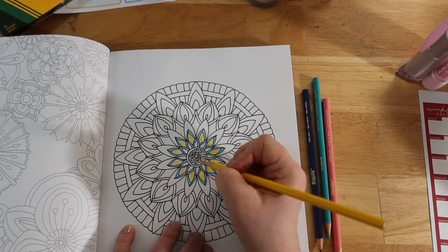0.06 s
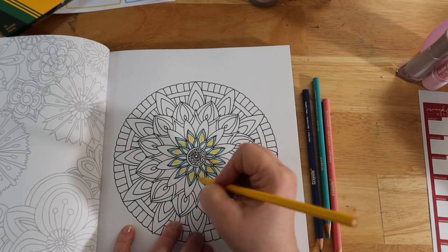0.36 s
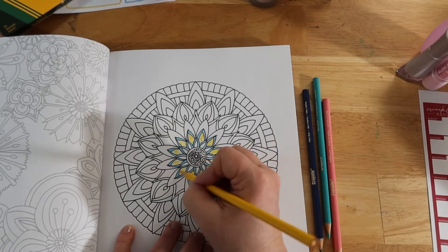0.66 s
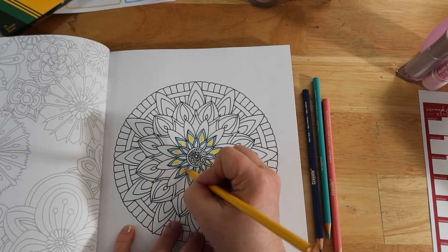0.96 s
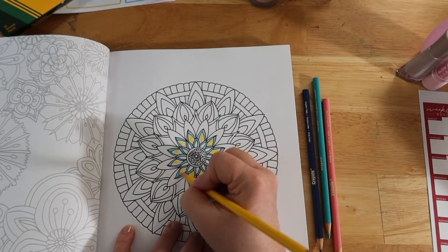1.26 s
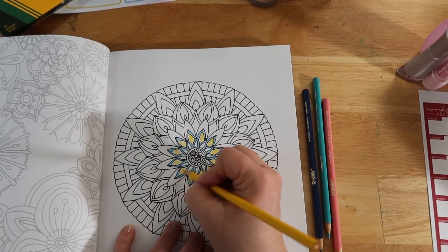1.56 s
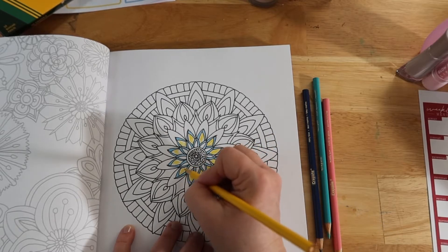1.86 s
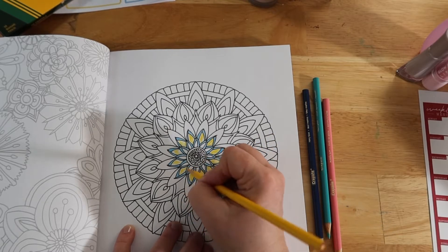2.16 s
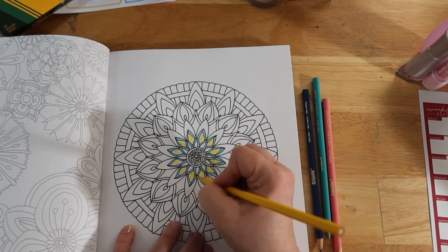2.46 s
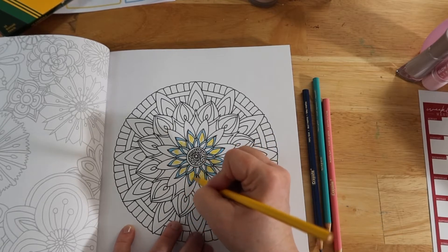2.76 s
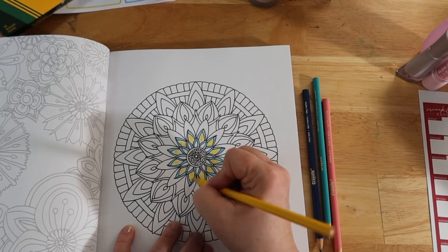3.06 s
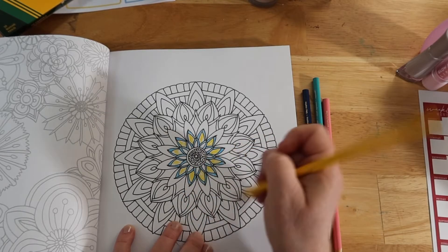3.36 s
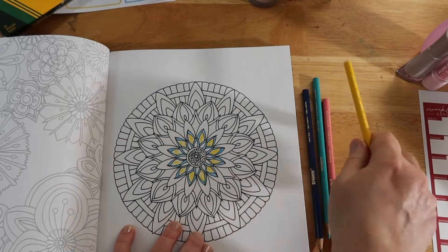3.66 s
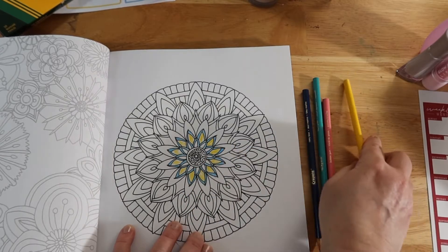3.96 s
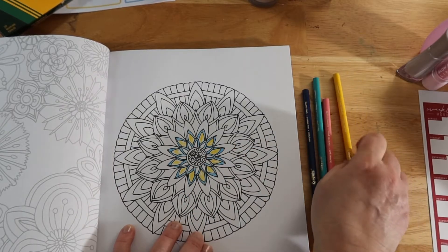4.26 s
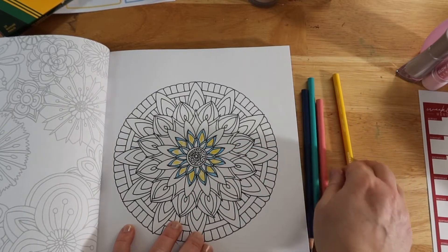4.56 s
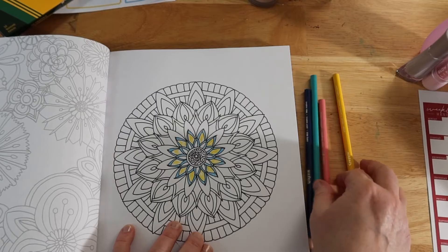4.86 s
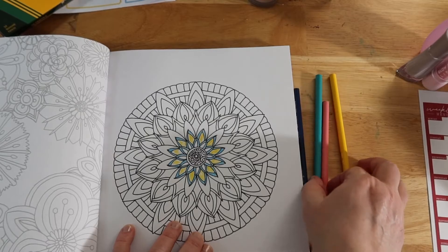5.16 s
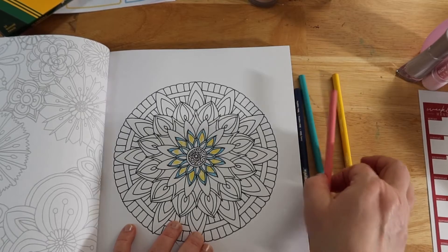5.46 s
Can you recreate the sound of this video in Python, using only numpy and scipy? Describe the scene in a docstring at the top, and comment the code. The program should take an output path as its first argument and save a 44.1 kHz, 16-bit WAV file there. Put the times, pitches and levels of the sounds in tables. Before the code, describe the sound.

A colored pencil rubs faintly on paper, then drops and bounces on a wooden table, where pencils clack and scrape together.

```python
"""Coloured pencils on a wooden table

In a quiet room a pencil rubs faintly on a colouring book, taps the table and is let go.
It bounces and rolls to rest; then a hand pushes the pencils beside it, which clack, scrape and knock.
Each hit makes pencil and table ring with a few fading tones; rubbing is noise that swells and fades."""
import sys
import numpy as np
from scipy import signal
from scipy.fft import rfft, irfft
from scipy.io import wavfile
from scipy.ndimage import uniform_filter1d

SR = 44100
rng = np.random.default_rng(int(sys.argv[2]) if len(sys.argv) > 2 else 0)


def to_wav(sig):
    """Store sig (one row per channel, or 1-D mono) as 16-bit WAV at the path in sys.argv[1].

    Samples outside -1..1 are clipped; the rate is SR.
    """
    pcm = np.clip(np.atleast_2d(sig), -1, 1) * 32767
    pcm = np.round(pcm).astype(np.int16)
    wavfile.write(sys.argv[1], SR, pcm.T)  # frames by channels


N = 247842
TIME, RING_TIME = np.arange(N) / SR, np.arange(SR // 3) / SR

# The held pencil taps the table: start_s, pencil_db, table_db, cutoff_hz
TAPS = [(3.888, -17.5, -29.5, 9900), (3.9372, -22, -32, 8500), (3.964, -29, -34.5, 4160)]
# The dropped pencil lands: start_s, pencil_db, table_db, on_point (0 blunt end, 1 point)
BOUNCES = [(4.141, -14.5, -21.5, 0), (4.143, -17.5, -19.5, 0.32), (4.165, -37, -34, 0.47),
           (4.177, -28, -31, 0.92), (4.2046, -19, -27, 0.6), (4.209, -21.5, -38, 0.9),
           (4.217, -28, -31, 0.4), (4.229, -35, -44, 0.91), (4.248, -25.5, -39, 0.55),
           (4.257, -24.5, -28.5, 0.63), (4.280, -23.5, -29, 0.33), (4.284, -25, -38, 0.79),
           (4.31, -26, -34, 0.63), (4.330, -26.5, -42, 0.084), (4.352, -28.5, -32.5, 0.16),
           (4.372, -32.5, -38, 0.17)]
# Pencil hits pencil: start_s, pencil_db, table_db, cutoff_hz, near_end (0 to 1)
CLACKS = [(4.4201, -24, -41, 12600, 0.05), (4.443, -29, -43, 8000, 0.6), (4.4976, -23.5, -34, 9500, 0.04),
          (4.896, -35, -49, 8200, 0.36), (4.993, -36.5, -55, 5460, 0), (5.068, -20, -35, 11800, 1),
          (5.407, -35.5, -34, 5470, 0.3), (5.442, -32.5, -34, 6300, 0.14)]
# Softer hits on the table: start_s, pencil_db, table_db
NUDGES = [(4.758, -37.5, -35.5), (4.807, -31.5, -33), (4.835, -27, -28), (4.939, -35, -34),
          (4.978, -32, -49), (4.993, -31, -39), (5.396, -31.5, -38), (5.409, -30, -31.5),
          (5.442, -26, -35.5), (5.478, -29.5, -33)]  # tipping onto the next flat side
KNOCKS = [(4.448, -25, -32.5), (4.503, -25, -36), (5.086, -21, -25), (5.574, -36.5, -38.5)]  # settling on the wood
# The hand pushes pencils over the wood: start_s, length_s, friction_db
SHOVES = [(4.439, 0.078, -35.5), (4.689, 0.05, -52.5), (4.8, 0.14, -50), (4.925, 0.06, -44.5),
          (4.982, 0.031, -32.5), (5.157, 0.064, -53), (5.242, 0.1, -47.5), (5.379, 0.093, -39.5)]
# The lead moves over paper: middle_s, length_s, rub_db, hiss_db, pitch_factor
STROKES = [(0.62, 0.035, -52.5, -84, 0.55), (0.824, 0.04, -46.5, -83, 0.98),
           (1.066, 0.027, -55, -58.5, 1.15), (1.411, 0.038, -56, -65, 1.24),
           (2.068, 0.055, -54, -62.5, 1.25), (2.797, 0.08, -62, -63, 1.6), (3.018, 0.055, -62, -67, 3.3)]
# The point is set down on the book: start_s, page_db, table_db
PRESSES = [(0.261, -46.5, -40.5), (0.809, -62, -42)]

# The tones a thing rings with when hit: pitch_hz, level_db, fade_s (time to fall by 60 dB)
HELD_TONES = [(1300, -8, 0.05), (1600, -4, 0.035), (1943, -5.5, 0.055), (2676, -2.5, 0.022),
              (3100, -2, 0.02), (4470, -2.5, 0.03), (9850, -17, 0.012)]  # a pencil in the hand
FREE_TONES = [(1063, -3, 0.042), (1107, -6, 0.057), (1314, -8.5, 0.034), (1523, -8, 0.023),
              (1948, -9.5, 0.033), (2560, -12.5, 0.052), (3200, -5.5, 0.027), (3670, -4, 0.019),
              (4533, -11.5, 0.042), (7020, -17, 0.052), (10160, -12.5, 0.018)]  # a loose pencil
CLACK_TONES = [(2530, 3, 0.045), (4850, -3.5, 0.075), (7650, -11, 0.05), (10200, -13, 0.022)]  # a pencil hit by another
BUNDLE_TONES = [(1083.5, -8, 0.061), (1453, 6, 0.022), (1937, -8, 0.071), (2100, 3, 0.013),
                (2563, -10, 0.044), (3040, -2.5, 0.028), (3760, -8, 0.02)]  # pencils lying together
TABLE_TONES = [(114, -14.5, 0.2), (231, -7.5, 0.097), (274, -14, 0.082), (330.6, -9.5, 0.16),
               (400, -13.5, 0.088), (443, -12.5, 0.17), (549, -9.5, 0.13), (804, -3.5, 0.034)]
THUMP_TONES = [(215, -2, 0.029)]  # the table under the hand's weight
TICK_TONES = [(2400, 0, .02), (7080, -4, .025), (9800, -10, .03)]  # a pencil turned in the fingers
BOOK_TONES = [(490, 0, .45), (850, -4, .25)]

# How strong each noise is from bass to treble: frequency_hz, level_db
PENCIL_CRACK = [(100, 16), (900, -11.5), (2400, 0.5), (3500, 11.5), (6000, -3), (11000, -11), (16000, -13)]
PENCIL_SNAP = [(300, -17), (2300, -5), (3700, -9), (4900, 2), (6800, 1), (9000, -7), (11000, -3),
               (16000, -42)]
TABLE_THUD = [(60, -28), (160, -14), (250, 0), (560, 0), (850, -4), (1500, -5), (2400, -11), (5000, -22),
              (12000, -42)]
TABLE_RUB = [(90, -37), (230, 16), (550, 10), (900, 7.5), (1600, 3), (3500, -6), (10000, -45)]
BOOK_RUB = [(100, -26), (420, -8), (500, 4), (640, -7), (1100, -18), (2000, -16), (5000, -36), (12000, -60)]
LEAD_HISS = [(300, -26), (2200, 29), (4500, -6), (7000, 18), (9000, 14), (13000, 15), (16000, -6)]
ROOM_NOISE = [(27, -13.5), (46, 2), (77, -6), (113, -11.5), (146, -6), (210, -2.5), (285, -6.5), (825, -13),
              (2800, -19), (6540, -26), (13500, -39), (16000, -46)]

# Boosts and cuts: frequency_hz, gain_db
POINT_BOOST = [(1100, -6), (1800, 18), (3400, -24), (4500, 11.5), (7000, 4)]  # landing on the point rather than the blunt end
TABLE_BASS = [(110, 4), (155, -7), (200, 0)]  # the table gives off little sound between its two lowest tones
NOISE_WIDTH = [(30, -40), (120, 1), (2000, -1), (8000, -6), (14000, -1.5)]  # stereo spread of the room noise
ECHO_WIDTH = [(60, -44), (200, -22), (2500, -17.5), (5000, -5.5), (8000, -1.5), (12000, 3.5)]  # stereo spread of the echoes
# How long the room echoes: frequency_hz, fade_s
ROOM_FADE = [(100, 0.44), (1500, 0.3), (5000, 0.21)]


def taps():
    """The held pencil hits the table, and the weight of the hand adds a thump."""
    out = np.zeros(N)
    for start_s, *hit in TAPS:
        pencil = ring(HELD_TONES) + ring(THUMP_TONES) + amp(-2) * burst(PENCIL_CRACK, fade_s=0.011)
        add(out, start_s, strike(pencil, *hit, rise_s=0.00035, rebound=0.49))
    return out


def bounces(hardest_cutoff_hz=10200, db_per_octave=10, rattle_gap_s=0.0075, rattle_db=-8):
    """The dropped pencil bounces: its blunt end gives a woody crack, its point a high ping."""
    out = np.zeros(N)
    hardest_db = max(row[1] for row in BOUNCES)
    for start_s, pencil_db, table_db, on_point in BOUNCES:
        tones = np.array(FREE_TONES, float)
        tones[:, 1] += on_point * look_up(POINT_BOOST, tones[:, 0])
        # a harder landing is a shorter contact: brighter, with more crack
        cutoff_hz = hardest_cutoff_hz * 2 ** ((pencil_db - hardest_db) / db_per_octave)
        crack_db = 9.5 + 0.32 * pencil_db
        pencil = ring(tones) + amp(crack_db) * burst(PENCIL_CRACK, fade_s=0.021)
        add(out, start_s, strike(pencil, pencil_db, table_db, cutoff_hz, rise_s=0.00035, rebound=0.25))
        # the six-sided barrel rattles twice more, too lightly to move the table
        for delay_s in np.cumsum(rattle_gap_s * rng.uniform(0.5, 1, size=2)):
            barrel = ring(tones, blur=0.09) + burst(PENCIL_CRACK, fade_s=0.015)
            rattle = strike(barrel, pencil_db, -np.inf, cutoff_hz, rise_s=0.00026, rebound=0)
            add(out, start_s + delay_s, amp(rattle_db) * rattle)
    return out


def knocks(nudge_cutoff_hz=3800, knock_cutoff_hz=1600):
    """Pencils tip from one flat side to the next, or settle with a duller knock."""
    out = np.zeros(N)
    for rows, cutoff_hz in [(NUDGES, nudge_cutoff_hz), (KNOCKS, knock_cutoff_hz)]:
        for start_s, *hit in rows:
            bundle = ring(BUNDLE_TONES) + amp(-3.5) * burst(PENCIL_CRACK, fade_s=0.037)
            add(out, start_s, strike(bundle, *hit, cutoff_hz, rise_s=0.0023, rebound=0.4))
    return out


def clacks(recoil_s=0.0105, recoil_db=-8, detune=0.014):
    """Two pencils hit each other, spring apart and meet again."""
    out = np.zeros(N)
    for start_s, *hit, near_end in CLACKS:
        # near its end a pencil's lowest tone has a still point: a hit there snaps and barely rings it
        tones = np.array(CLACK_TONES, float)
        tones[0, 1] -= 30 * near_end
        snap = amp(9.9 * near_end) * burst(PENCIL_SNAP, fade_s=0.0022)
        add(snap, recoil_s, amp(recoil_db) * burst(PENCIL_SNAP, fade_s=0.014))
        buzz = amp(-12) * burst(PENCIL_SNAP, fade_s=0.036)
        # the two differ a little in length, so in pitch, and rub as they ring
        pair = sum(ring(tones * [1 + k * detune, 1, 1], blur=0.065) for k in (-1, 1)) / np.sqrt(2)
        add(out, start_s, strike(pair + snap + buzz, *hit, rise_s=0.0001, rebound=0.2))
    return out


def strike(body, body_db, table_db, cutoff_hz, rise_s, rebound):
    """One hit rings a thing and the table under it; a softer hit has a lower treble cutoff."""
    table = ring(TABLE_TONES) + burst(TABLE_THUD, fade_s=0.053)
    onset = 1 - np.exp(-RING_TIME / rise_s)
    sound = onset * (amp(body_db) * body + amp(table_db) * table)
    # a long stick does not land all at once: another part touches a moment later
    add(sound, rng.uniform(0.0008, 0.0035), rebound * sound)
    # things this small give off no deep bass
    return keep_band(sound, low_hz=149, high_hz=np.clip(cutoff_hz, 500, SR / 2.2))


def sliding(roll_start_s=4.215, roll_stop_s=4.44, roll_db=-40, fade_db_per_s=6, slips_per_s=900):
    """As pencils roll or are pushed, tiny slips rub the wood and make them ring."""
    rolled_s = np.maximum(TIME - roll_start_s, 0)
    # the dropped pencil loses speed until it meets its neighbours
    roll = motion(roll_start_s, roll_stop_s) * amp(roll_db - fade_db_per_s * rolled_s)
    shoves = [amp(db) * motion(start_s, start_s + length_s) for start_s, length_s, db in SHOVES]
    friction = np.max([roll] + shoves, axis=0)
    slips = (rng.random(N) < slips_per_s / SR) * rng.random(N)
    grain = signal.oaconvolve(slips, amp(-60 * RING_TIME / 0.012))[:N]
    ringing = unit(signal.oaconvolve(slips * rng.choice([-1, 1], N), ring(BUNDLE_TONES))[:N])
    rub = unit(grain * noise(TABLE_RUB))
    scrape = friction * unit(rub + amp(-4) * ringing)
    return keep_band(scrape, low_hz=110, high_hz=5500, order=3)  # smooth lacquer does not hiss


def motion(start_s, stop_s, rise_s=0.017, coast_db_per_s=264):
    """The loudness of one movement: it gets going, holds and coasts to rest."""
    rise = np.clip((TIME - start_s) / rise_s, 0, 1)
    return rise * amp(-coast_db_per_s * np.maximum(TIME - stop_s, 0))


def squeak(middle_s=4.843, length_s=0.034, level_db=-31.5, centre_hz=1500, wobble_hz=125):
    """A pencil sticks and slips very fast, making a brief squeak of unsteady pitch."""
    pitch_hz = centre_hz + wobble_hz * unit(uniform_filter1d(rng.standard_normal(N), size=150))
    swell = np.exp(-(2 * (TIME - middle_s) / length_s) ** 2)
    return amp(level_db) * swell * unit(np.sin(2 * np.pi * np.cumsum(pitch_hz) / SR))


def shading():
    """In each stroke the waxy lead drags with a low rubbing note and hisses on the paper."""
    out, t = np.zeros(N), RING_TIME - RING_TIME.mean()
    for middle_s, length_s, rub_db, hiss_db, pitch_factor in STROKES:
        rub = amp(rub_db) * noise(np.multiply(BOOK_RUB, [pitch_factor, 1]), size=len(t))
        hiss = amp(hiss_db) * noise(LEAD_HISS, size=len(t))
        swell = np.exp(-(2 * t / length_s) ** 2)
        add(out, middle_s + t[0], swell * (rub + hiss))
    return out


def touches(tick_s=3.6425, tick_db=-42.5):
    """The point thuds softly through book and table; later the pencil ticks as the fingers turn it."""
    out = np.zeros(N)
    for start_s, *hit in PRESSES:
        page = ring(BOOK_TONES, blur=0.1)
        add(out, start_s, strike(page, *hit, cutoff_hz=800, rise_s=0.0035, rebound=0))
    add(out, tick_s, amp(tick_db) * ring(TICK_TONES))
    return out


def room(sound, direct_db=-2, tail_db=-7, scatter_db=-4):
    """Adds faint wall echoes and a short tail; sound bouncing off nearby things widens the treble."""
    mid_echoes = amp(tail_db) * echo_tail()
    for delay_s, db in [(0, 0), (0.0018, -11), (0.0102, -18), (0.0225, -20)]:
        mid_echoes[round(delay_s * SR)] += amp(direct_db + db)
    scatter = rng.standard_normal(SR) * amp(-60 * np.arange(SR) / SR / 0.005)
    side_echoes = amp(tail_db) * echo_tail() + amp(scatter_db) * scatter / np.linalg.norm(scatter)
    mid = signal.fftconvolve(sound, mid_echoes)[:N]
    side = colour(signal.fftconvolve(sound, side_echoes)[:N], ECHO_WIDTH)
    return np.array([mid + side, mid - side])


def echo_tail():
    """Many small echoes at random times, the treble dying first."""
    echoes = rng.choice([-1., 1.], SR) * (rng.random(SR) < 0.1)
    hz, t, bands = signal.stft(echoes, SR, nperseg=256)
    fade = amp(-60 * t / look_up(ROOM_FADE, hz)[:, None])
    tail = signal.istft(bands * fade, SR, nperseg=256)[1][:SR]
    tail *= np.minimum(np.arange(SR) / SR / 0.002, 1) ** 2
    return tail / np.linalg.norm(tail)


def background(noise_db=-53, hum_db=-60):
    """Steady room noise and hiss, with a low hum."""
    mid = amp(noise_db) * noise(ROOM_NOISE) + amp(hum_db) * hum()
    side = amp(noise_db) * colour(noise(ROOM_NOISE), NOISE_WIDTH)
    return np.array([mid + side, mid - side])


def hum(pitch_hz=113, width_hz=40):
    """A wavering tone: noise kept to a narrow band around one pitch."""
    distance = (np.fft.rfftfreq(N, 1 / SR) - pitch_hz) / width_hz
    return unit(irfft(rfft(rng.standard_normal(N)) / (1 + distance ** 2), N))


def ring(tones, blur=0.04):
    """Fading tones; each spot that is hit shifts their level and pitch, and loose contact blurs them."""
    hz, db, fade_s = np.transpose(tones)[:, :, None]
    level_shift, pitch_shift, direction = rng.standard_normal((3, len(tones), 1))
    fade = amp(db + 1.8 * level_shift - 60 * RING_TIME / fade_s)
    phase = 2 * np.pi * hz * (1 + 0.008 * pitch_shift) * RING_TIME
    phase += blur * np.sqrt(hz / 4000) * np.cumsum(rng.standard_normal(fade.shape), 1)
    return (np.sign(direction) * fade * np.sin(phase)).sum(0)


def burst(curve, fade_s):
    """Fading noise: tones too crowded to tell apart."""
    return noise(curve, size=len(RING_TIME)) * amp(-60 * RING_TIME / fade_s)


def noise(curve, size=N):
    """Noise of strength 1, shaped from bass to treble by a curve."""
    return unit(colour(rng.standard_normal(size), curve))


def colour(sound, curve):
    """Boosts and cuts frequencies along a curve; nothing sounds ahead of its cause."""
    log_gain = np.log(amp(look_up(curve, abs(np.fft.fftfreq(len(sound), 1 / SR)))))
    response = np.exp(signal.hilbert(log_gain).conj())
    return irfft(rfft(sound) * response[:len(sound) // 2 + 1], len(sound))


def keep_band(sound, low_hz, high_hz, order=2):
    """Turns down what lies below low_hz or above high_hz."""
    return signal.sosfilt(signal.butter(order, [low_hz, high_hz], "bandpass", fs=SR, output="sos"), sound)


def look_up(curve, hz):
    """Reads between a table's rows, with octaves evenly spaced."""
    row_hz, values = np.transpose(curve)
    return np.interp(np.log(hz + 1), np.log(row_hz + 1), values)


def add(mix, start_s, sound):
    """Mixes a sound in at start_s."""
    part = mix[round(start_s * SR):][:len(sound)]
    part += sound[:len(part)]


def amp(db):
    """Turns decibels into a multiplier."""
    return 10 ** (np.asarray(db) / 20)


def unit(sound):
    """Scales to an average strength (rms) of 1."""
    return sound / np.sqrt(np.mean(sound ** 2) + 1e-20)


def scene():
    """All the sounds in the room, with the pencils a little to the right."""
    on_table = colour(taps() + bounces() + knocks() + clacks() + sliding() + squeak(), TABLE_BASS)
    return room(on_table + shading() + touches()) * amp([[-0.4], [0.4]]) + background()


def record(dry):
    """Removes the very highest treble."""
    treble_cut = signal.firwin(511, cutoff=16000, window=("kaiser", 9), fs=SR)
    return signal.oaconvolve(dry, treble_cut[None], "same")


dry = scene()
out = record(dry)
to_wav(out)
```